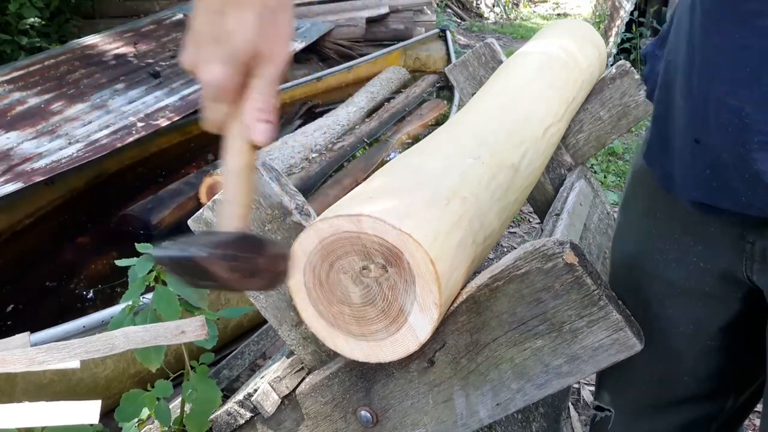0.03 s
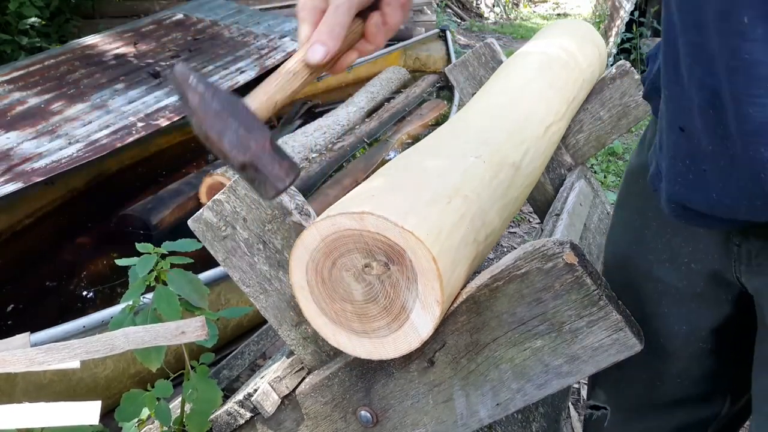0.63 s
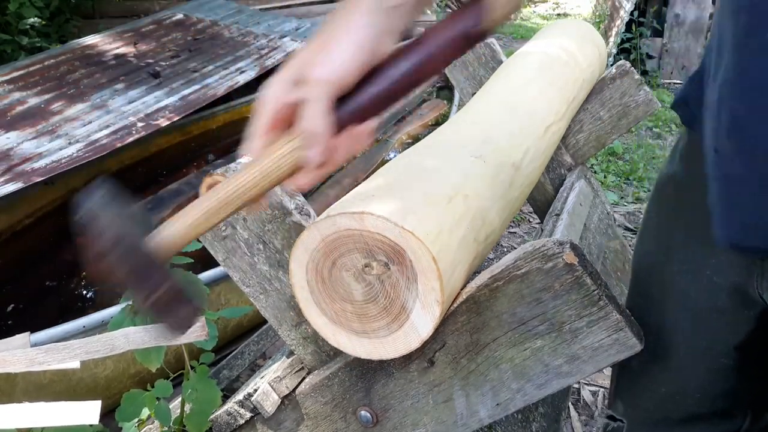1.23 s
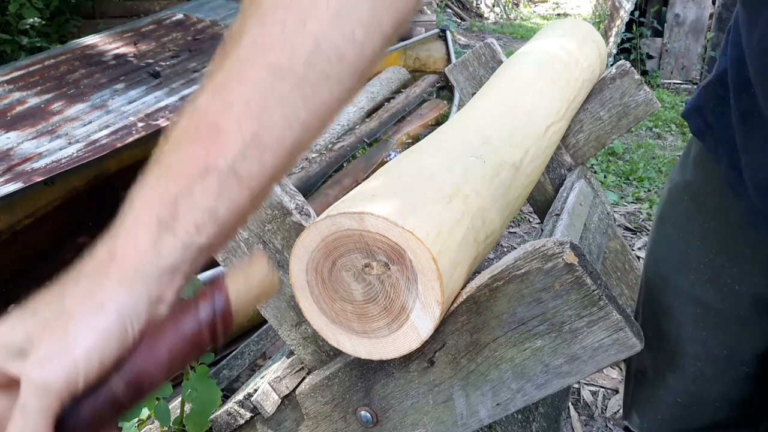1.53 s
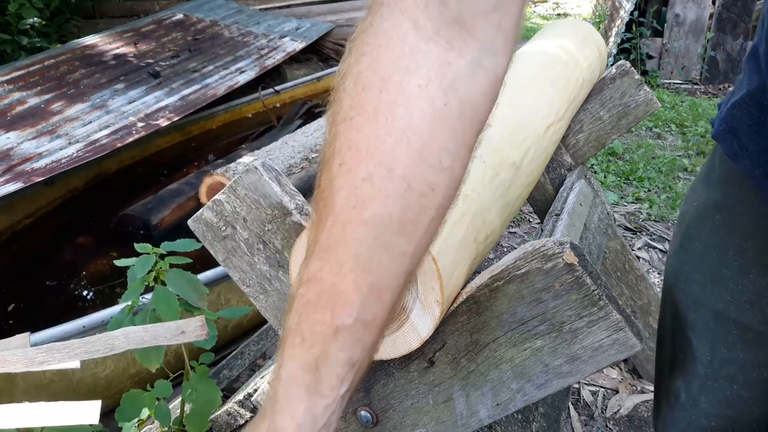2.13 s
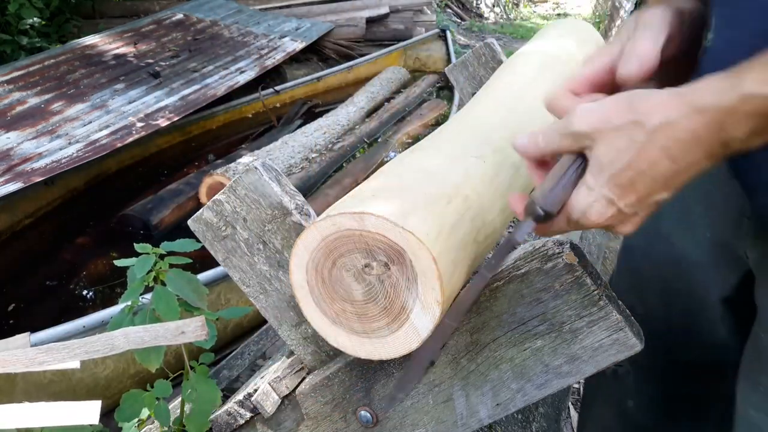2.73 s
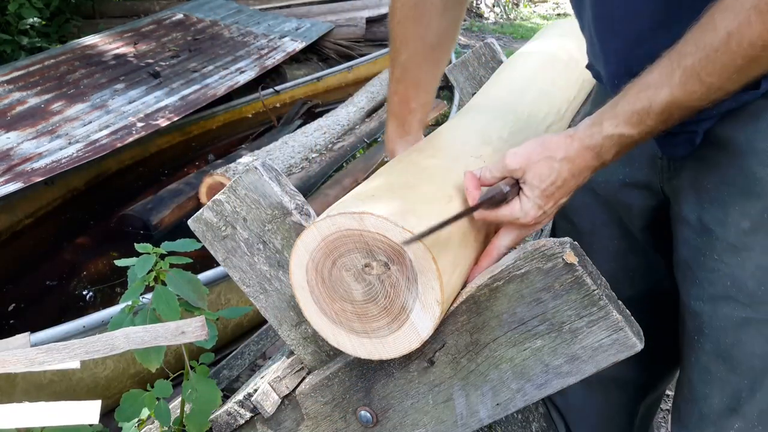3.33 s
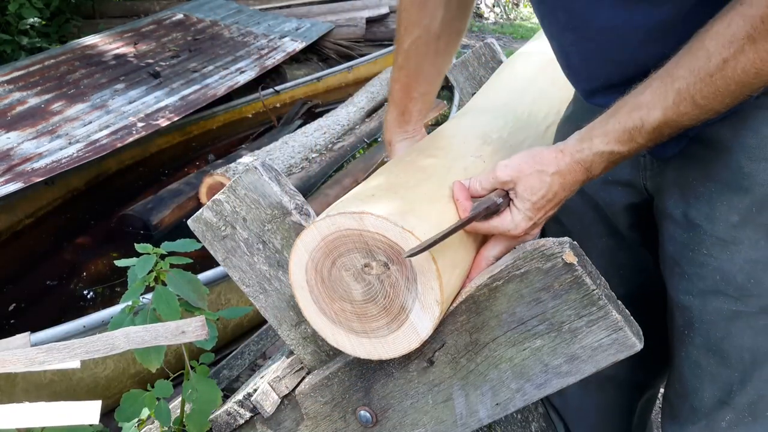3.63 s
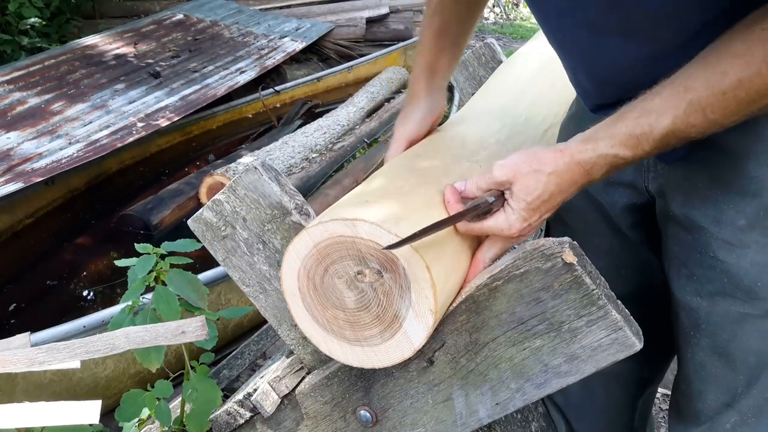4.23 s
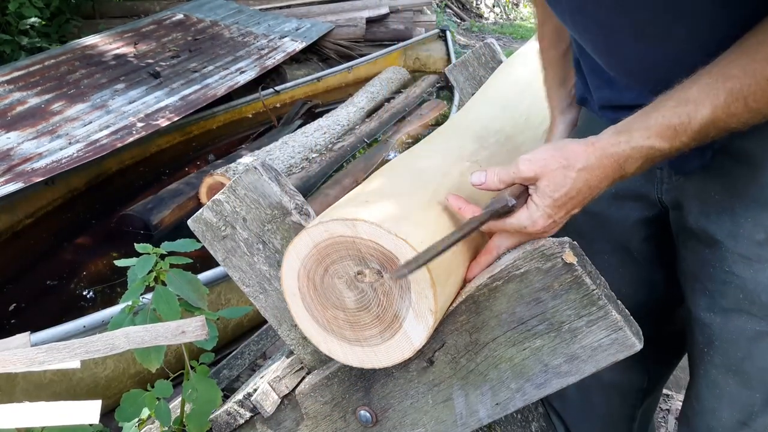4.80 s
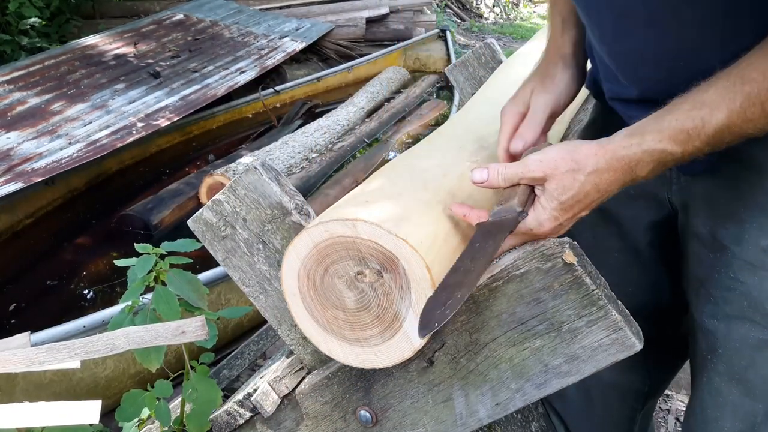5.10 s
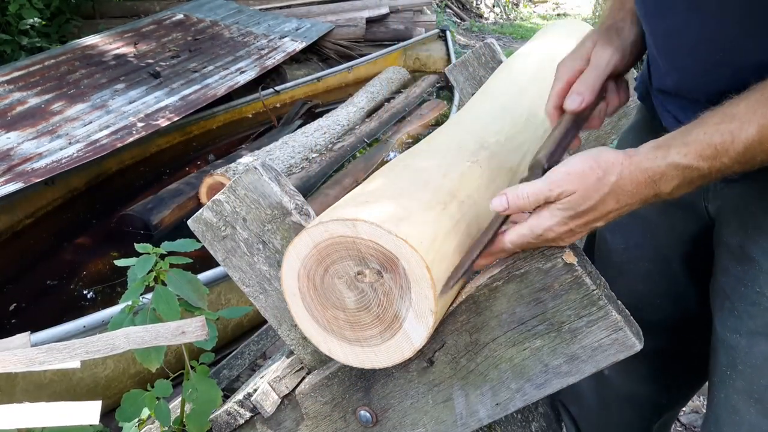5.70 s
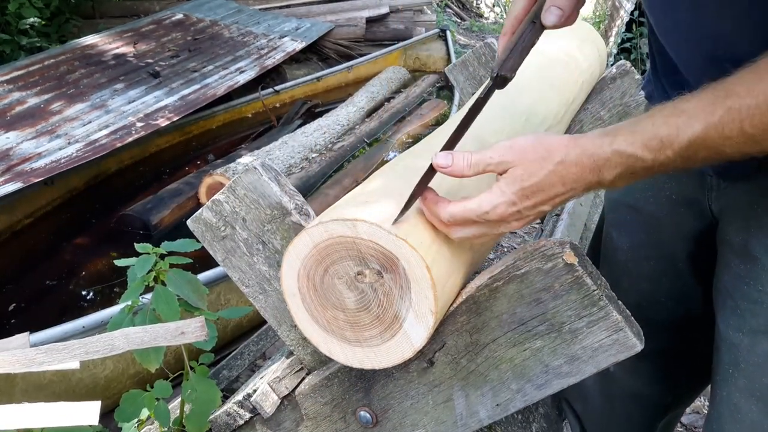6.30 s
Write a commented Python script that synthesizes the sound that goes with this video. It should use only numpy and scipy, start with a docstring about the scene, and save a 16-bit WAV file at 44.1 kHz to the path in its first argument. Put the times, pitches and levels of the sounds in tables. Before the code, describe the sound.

Two sharp hammer knocks on wood, a bouncing clatter, then light knife ticks and soft wooden bumps in a quiet yard.

```python
"""A quiet yard, close to a sawhorse, with far birds and a low rumble. A hammer knocks twice on a peeled
log, exciting its bending modes, then is dropped on a board and bounces to rest. Sleeves and palms rustle
by friction, a long knife is picked up and rings faintly, the log is rocked in its cradle and the blade
is set against it. Each struck body sounds as a sum of damped modes: the shorter the contact, the
brighter the sound. Stacked wood, walls and trees scatter it back."""
import sys
import numpy as np
from scipy import signal
from scipy.fft import rfft, irfft
from scipy.io import wavfile

SR = 44100
rng = np.random.default_rng(int(sys.argv[2]) if len(sys.argv) > 2 else 0)


def to_wav(s):
    """Save 16-bit WAV."""
    ch = np.atleast_2d(s).T  # columns
    pcm = np.round(np.clip(ch, -1, 1) * 32767)  # PCM
    wavfile.write(sys.argv[1], SR, pcm.astype(np.int16))


N = 288855
AGE = np.arange(SR // 2) / SR  # seconds since a contact
NORMAL_CONTACT_HZ = 1000  # cut-off of a contact of hardness 1


def from_db(db):
    """Amplitude ratio: a factor of ten per 20 dB."""
    return 10 ** (np.asarray(db) / 20)


def add(out, s, sound):
    """Superposition: a sound joins the mix at time s."""
    at = max(0, round(s * SR))
    out[at:at + len(sound)] += sound[:N - at]


def noise(spectrum, size=N):
    """Spectral shaping: white noise takes on a given spectrum, scaled to rms 1."""
    hz, db = np.transpose(spectrum)
    bins = np.maximum(np.arange(size // 2 + 1) * SR / size, 1)
    gain = from_db(np.interp(np.log(bins), np.log(hz), db))
    bass_loss = np.sqrt(1 + (hz[0] / 2 / bins) ** 4)
    x = irfft(rfft(rng.standard_normal(size)) * gain / bass_loss, size)
    return x / x.std()


def fade(t60, t=AGE):
    """Exponential decay: 60 dB in t60 seconds."""
    return np.exp(-np.log(1000) * t / t60)


def ring(modes, contact_hz, sign=-1):
    """Modal sum: soft contacts swell slowly and leave high modes weak; sign -1 alternates polarity."""
    swell = 1 - np.exp(-AGE * contact_hz)
    total = 0
    for k, (hz, db, t60) in enumerate(modes):
        amplitude = sign ** k * from_db(db) / np.hypot(1, (hz / contact_hz) ** 2)
        total += amplitude * fade(t60) * np.sin(2 * np.pi * hz * AGE)
    return swell * total


def burst(spectrum, db, t60, rise_s=0.001):
    """Modal overlap: countless short-lived modes merge into noise that swells during the contact."""
    swell = 1 - np.exp(-(AGE / rise_s) ** 2)
    return from_db(db) * noise(spectrum, size=len(AGE)) * fade(t60) * swell


def shared(modes, shift_db):
    """Modal weighting: the point of impact shifts strength from the second mode to the first."""
    return [(hz, db + shift_db * ((k == 0) - (k == 1)), t60) for k, (hz, db, t60) in enumerate(modes)]


def ring_cutoff(hold_s, fall_s, floor_db):
    """Amplitude envelope: the ring sounds for hold_s, then dies away abruptly."""
    return from_db(floor_db * np.clip((AGE - hold_s) / fall_s, 0, 1))


def dull(x, hz):
    """Low-pass filtering: the treble falls away above hz."""
    return signal.sosfilt(signal.butter(3, min(hz, .45 * SR), fs=SR, output="sos"), x)


def thin(x, hz):
    """High-pass filtering: the bass falls away below hz."""
    return signal.sosfilt(signal.butter(2, hz, "high", fs=SR, output="sos"), x)


def bell_filter(x, hz, gain_db, q):
    """Second-order resonance: a peak or dip around hz."""
    a, w = from_db(gain_db / 2), 2 * np.pi * hz / SR
    k = np.sin(w) / (2 * q)
    return signal.lfilter([1 + k * a, -2 * np.cos(w), 1 - k * a], [1 + k / a, -2 * np.cos(w), 1 - k / a], x)


# spectrum of the echoes: f/Hz, relative level/dB
ECHO_SPECTRUM = [(80, -9.5), (300, -6.5), (600, -2), (1200, 2.5), (3000, 2.5), (8000, 1), (10000, -8),
                 (14000, -16.5)]


def yard_echo(x, wet_db, t60, late_db, late_t60):
    """Reverberation: scatter from stacked wood nearby, then a faint tail from walls and trees."""
    t = np.arange(2 * SR) / SR
    decay = fade(t60, t) + from_db(late_db) * fade(late_t60, t)
    onset = 1 - np.exp(-(t / 0.002) ** 2)
    echo = noise(ECHO_SPECTRUM, size=len(t)) * decay * onset
    return from_db(wet_db) * signal.fftconvolve(x, echo / np.linalg.norm(echo))[:N]


# spectrum of the outdoor background: f/Hz, relative level/dB
RUMBLE_SPECTRUM = [(20, -14.5), (38, -15), (54, 0), (75, -6), (100, -3.5), (126, 1.5), (160, -4),
                   (250, -10.5), (500, -17), (1000, -23), (2200, -28.5), (4500, -33.5), (14500, -46)]


def distant_rumble():
    """Stationary noise: a steady background, strongest in the bass."""
    return from_db(-70.5) * noise(RUMBLE_SPECTRUM)


def whistle(length, start_hz, end_hz, db, waver):
    """Frequency modulation: a wavering note slides fast at first and levels out on its end pitch."""
    progress = np.linspace(0, 1, int(length * SR))
    hz = end_hz + (start_hz - end_hz) * (1 - progress) ** 2.5
    hz *= 1 + waver * noise([(60, -1.5), (180, -9.0), (900, -46.5)], size=len(progress))
    envelope = np.sin(np.pi * progress ** .7)
    return from_db(db) * envelope * np.sin(2 * np.pi * np.cumsum(hz) / SR)


# one bird's slurs and another's high whistle: t/s, length/s, start f/Hz, end f/Hz, level/dB
SLURRED_NOTES = [(0.03, 0.16, 2490, 2350, -75), (0.455, .17, 3800, 2240, -70),
                 (0.621, 0.08, 2450, 2874, -67.5), (0.981, 0.14, 2510, 2200, -71),
                 (1.15, 0.065, 2700, 2516, -67), (1.183, 0.11, 2399, 2090, -71),
                 (1.635, 0.1, 2800, 2580, -64.5), (1.738, 0.035, 2560, 2676, -62),
                 (1.76, 0.1, 2250, 2100, -76), (2.181, 0.083, 2650, 2587, -63),
                 (2.31, 0.09, 2315, 2187, -65), (2.393, 0.055, 2387, 3164, -64),
                 (2.776, 0.063, 2843, 2670, -62.5), (2.795, 0.24, 2330, 2200, -71.5),
                 (4.078, .07, 2757, 2900, -82.5)]
HIGH_NOTE = (0, 0.2, 7250.5, 7351.5, -77)


def far_birds(direct_db=-2.5):
    """Reverberant field: from far away, the echoes of the whistles outweigh the direct sound."""
    song = np.zeros(N)
    for s, *note in SLURRED_NOTES:
        add(song, s, whistle(*note, waver=0.025))
    s, *note = HIGH_NOTE
    add(song, s, whistle(*note, waver=0.0081))
    return from_db(direct_db) * song + yard_echo(song, wet_db=-1, t60=0.47, late_db=-6, late_t60=1.4)


# impact spectra of wood, steel and crushed fibres: f/Hz, relative level/dB
WOOD_CRACK = [(150, -11), (350, -2.5), (1000, 4.5), (1800, 0.5), (3000, -2), (4500, -16.5), (7000, -29),
              (10000, -48), (14000, -62.5)]
STEEL_TICK = [(2500, -19), (5000, -16.5), (8000, 2.5), (10000, -2), (14500, -7)]
FIBRE_SNAP = [(1500, -14), (2800, -3.5), (4200, -1.5), (6000, -5.5), (9000, -13), (14000, -30.5)]
# modes of the log, bending modes first: f/Hz, level/dB, T60/s
LOG_MODES = [(271.9, -2.5, .26), (614, -4.5, 0.32), (985, -10.5, 0.15), (1284, -7, 0.105),
             (1381, -9.5, .13), (1733, -10.5, 0.07), (1810, -4, 0.034), (1533, -5.5, 0.052),
             (182.5, -4.5, .085), (356, 5.5, .034), (423, 12, 0.022), (534, -11.5, 0.042),
             (790.3, -10, 0.046), (2340, -21, 0.082)]
# blows on the log: t/s, level/dB, contact cut-off f/Hz, shift to first mode/dB, snap level/dB
HAMMER_BLOWS = [(0.1776, -23, 1700, -2.5, -23), (0.6934, -20.5, 1176, 2, -50)]


def hammer_blows(crack_db=-13, tick_db=-18.5):
    """Impulse excitation: steel ticks, fibres snap, the log rings; harder contacts crack and tick more."""
    out = np.zeros(N)
    cut_short = ring_cutoff(hold_s=0.054, fall_s=0.019, floor_db=-26)
    for s, db, contact_hz, spot_db, snap_db in HAMMER_BLOWS:
        hardness = contact_hz / NORMAL_CONTACT_HZ
        log = from_db(db) * ring(shared(LOG_MODES, spot_db), contact_hz) * cut_short
        tick = dull(burst(STEEL_TICK, db + tick_db, t60=0.02), hz=6900)
        snap = dull(burst(FIBRE_SNAP, snap_db, t60=.016), hz=4800)
        crack = burst(WOOD_CRACK, db + crack_db, t60=0.035)
        add(out, s, log + snap + hardness ** 2 * (tick + crack))
    return out


# friction spectra of sleeves and palms: f/Hz, relative level/dB
SLEEVE_SPECTRUM = [(1500, -7), (3500, -1.5), (5500, -5.5), (8000, 8), (11000, -0.5), (14500, -12.5)]
PALM_SPECTRUM = [(100, -4), (300, 4), (600, -1), (1400, -10), (3000, -14), (6000, -32)]
# arm movements: t/s at peak speed, length/s, sleeve level/dB, palm level/dB
ARM_STROKES = [(1.08, 0.34, -86.5, -66.5), (1.54, .11, -84.5, -97), (1.93, 0.14, -65, -68),
               (2.33, 0.56, -75.5, -68.5), (2.95, .55, -66.5, -67.5), (3.55, .45, -75, -70.5),
               (4.722, .3, -82, -79), (5.014, .17, -80.5, -70.5), (5.79, 0.16, -74.5, -92),
               (6.51, .18, -87, -72.5)]


def sleeves_and_palms(swish_db=-6, rub_db=-2):
    """Sliding friction on cloth and bare wood: the noise follows the speed of each stroke."""
    t = np.arange(N) / SR
    sleeve, palm = from_db(-89.5), from_db(-79.5)  # never fully at rest
    for s, length, sleeve_db, palm_db in ARM_STROKES:
        speed = np.exp(-2 * ((t - s) / length) ** 2)
        sleeve = np.hypot(sleeve, from_db(sleeve_db) * speed)
        palm = np.hypot(palm, from_db(palm_db) * speed)
    swish = from_db(swish_db) * sleeve * noise(SLEEVE_SPECTRUM)
    rub = from_db(rub_db) * palm * noise(PALM_SPECTRUM)
    return swish + rub


def bounces(drop, count, flight_s=0.1144, restitution=0.64):
    """Inelastic collision: after the drop, each rebound comes sooner, weaker and softer."""
    s, db, contact_hz, roll_db, tick_db, tick_hz = drop
    loss_db, tick_loss_db, hardness_kept = 9, 17, 0.57  # per bounce
    return [(s + flight_s * (1 - restitution ** k) / (1 - restitution), db - k * loss_db,
             contact_hz * hardness_kept ** k, roll_db, tick_db - k * tick_loss_db, tick_hz)
            for k in range(count)]


# modes of the hammer (its two bending planes first) and of the board: f/Hz, level/dB, T60/s
HAMMER_MODES = [(794.3, -1.64, 0.17), (865.3, -1, 0.095), (408, -14.5, 0.2), (1852, 0, 0.052),
                (2104, -7.5, 0.095), (1335, 4.5, .015), (620, 4, 0.015), (1072, 4.5, .016),
                (2700, -16, .03), (3146, -9.5, 0.046), (3520, -12, .035)]
BOARD_MODES = [(125, -13.5, 0.032), (196, -8, 0.027), (275, 0, 0.023), (460, 3, 0.012), (660, -1.5, .018),
               (1050, -10, 0.011)]
# head and handle meeting the board, and the free drop:
# t/s, level/dB, contact cut-off f/Hz, roll shift/dB, tick level/dB, tick cut-off f/Hz
HAMMER_LANDINGS = [(1.8998, -35.5, 700, -2.5, -29.5, 13400), (1.9228, -31, 1500, -7, -35, 9000),
                   (1.9255, -27.5, 560, -4, -46.5, 8000), (2.0182, -38.5, 560, 2.5, -62, 8000),
                   (2.027, -30, 1900, -1, -38.5, 10000), (2.068, -38.5, 680, 2.5, -35, 7000)]
FREE_DROP = (2.0487, -19, 3300, 0, -17, 7600)


def hammer_dropped(board_db=5.5, crack_db=-4.5):
    """Momentum transfer: head and handle land and bounce; a soft, long contact pushes the board most."""
    out = np.zeros(N)
    for s, db, contact_hz, roll_db, tick_db, tick_hz in HAMMER_LANDINGS + bounces(FREE_DROP, count=4):
        hardness = contact_hz / NORMAL_CONTACT_HZ
        # the roll of the oval handle shares the blow between its two bending planes
        handle = ring(shared(HAMMER_MODES, roll_db), contact_hz)
        # the narrow board radiates little bass
        board = from_db(board_db) / hardness * thin(ring(BOARD_MODES, contact_hz=2200, sign=0.99), hz=165)
        tick = dull(burst(STEEL_TICK, tick_db, t60=.006, rise_s=.0003), tick_hz)
        crack = burst(WOOD_CRACK, db + crack_db, t60=.022)
        add(out, s, from_db(db) * (handle + board) + crack + tick)
    return out


# spectrum of a bump: f/Hz, relative level/dB
BUMP_SPECTRUM = [(70, -26), (160, 9), (350, -2), (600, -5), (1000, -13.5), (3000, -17), (6000, -21.5),
                 (14000, -58.5)]
# bumps on wood: t/s, level before filtering/dB, centre f/Hz
HAND_BUMPS = [(2.311, -33, 2200), (2.485, -44.5, 910), (2.963, -46.5, 1880), (3.176, -40.5, 270),
              (3.183, -46.5, 2600), (3.505, -51, 2000), (3.621, -52, 1500), (3.806, -49, 800),
              (4.787, -38, 600), (4.7942, -36.5, 570), (5.775, -52.5, 1500)]


def hand_bumps(spread_octaves=1.09):
    """Damped impact: hands and knife grip bump the wood, each giving a brief band of noise."""
    out = np.zeros(N)
    for s, db, hz in HAND_BUMPS:
        edges = hz * 2 ** np.array([-spread_octaves, spread_octaves])
        band = signal.butter(2, edges, "band", fs=SR, output="sos")
        add(out, s, signal.sosfilt(band, burst(BUMP_SPECTRUM, db, t60=0.041)))
    return out


# modes of the blade: f/Hz, level/dB, T60/s
BLADE_MODES = [(4845, 0.5, 0.2), (5950, 6.5, 0.068), (6850, 5, 0.075), (8250, -27, 0.091),
               (8900, 10.5, 0.054), (11600, -45.5, .2)]
# contacts of the blade: t/s, tick level/dB, ring level/dB
BLADE_TOUCHES = [(2.312, -38, -80), (2.4861, -60, -78), (2.512, -74, -76), (2.592, -57.5, -68),
                 (3.176, -47, -87), (3.184, -38.5, -76), (3.4728, -51.5, -84), (3.734, -47.5, -93),
                 (5.7773, -58, -78)]


def knife():
    """Free vibration of a thin blade: each touch ticks and excites the modes with random strengths."""
    out = np.zeros(N)
    for s, tick_db, ring_db in BLADE_TOUCHES:
        modes = [(hz, db + 4 * rng.standard_normal(), t60) for hz, db, t60 in BLADE_MODES]
        tick = dull(burst(STEEL_TICK, tick_db, t60=0.011), hz=10600)
        add(out, s, from_db(ring_db) * ring(modes, contact_hz=14000) + tick)
    return out


# modes of the cradle: f/Hz, level/dB, T60/s
CRADLE_MODES = [(104, -4, 0.086), (187.7, -7.5, 0.29), (278.7, 4, 0.085), (393, -8, 0.083), (518, 4, 0.083),
                (706, -9, 0.073), (1073, 4, 0.057), (1222, 3.5, 0.055), (1413, -7.5, 0.056),
                (1590, -16, 0.038), (2700, -8, 0.069)]
# knocks of the rocking log: t/s, level/dB, contact cut-off f/Hz
LOG_KNOCKS = [(4.252, -35, 505), (4.2569, -35, 1350), (4.2639, -37.5, 2600), (4.2722, -46, 1500)]


def log_rocked(crack_db=-12):
    """Repeated impact: the log slips and knocks in its cradle, which rings briefly, then is cut short."""
    out = np.zeros(N)
    cut_short = ring_cutoff(hold_s=0.055, fall_s=0.016, floor_db=-18)
    for s, db, contact_hz in LOG_KNOCKS:
        crack = contact_hz / NORMAL_CONTACT_HZ * burst(WOOD_CRACK, db + crack_db, t60=0.081)
        add(out, s, from_db(db) * ring(CRADLE_MODES, contact_hz) * cut_short + crack)
    return out


def scene():
    """Superposition in the open air: knocks, their echoes, birds, rustling and rumble."""
    blows = hammer_blows()
    clatter = hammer_dropped() + log_rocked() + hand_bumps() + knife()
    echoes = yard_echo(blows, wet_db=-14, t60=.22, late_db=-16, late_t60=0.83)
    echoes += yard_echo(clatter, wet_db=-15.5, t60=0.072, late_db=-14.5, late_t60=0.52)
    knocks = thin(blows + clatter + echoes, hz=65.6)  # small bodies radiate little deep bass
    return (knocks + far_birds() + sleeves_and_palms() + distant_rumble())[None]


def record(dry):
    """Port resonance: the microphone has a dip and a peak in the treble; deep bass and the top are cut."""
    x = bell_filter(dry, hz=6130, gain_db=-9.5, q=2.897)
    x = bell_filter(x, hz=8100, gain_db=12, q=4.2)
    x = thin(x, hz=45)
    return signal.sosfilt(signal.ellip(10, .2, 70, 14700, fs=SR, output="sos"), x)


dry = scene()
out = record(dry)
to_wav(out)
```